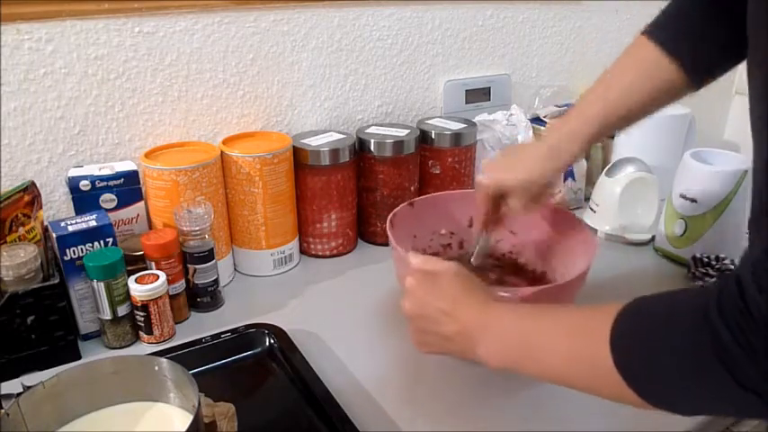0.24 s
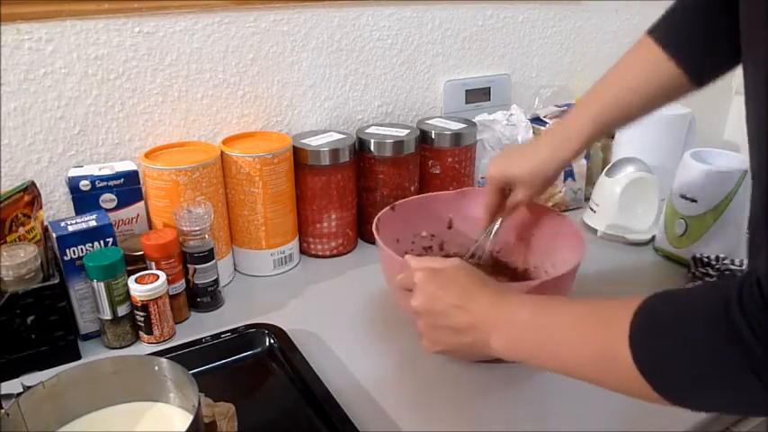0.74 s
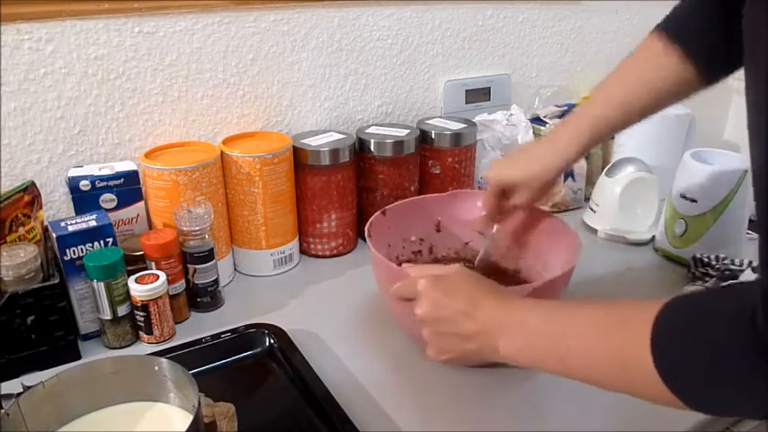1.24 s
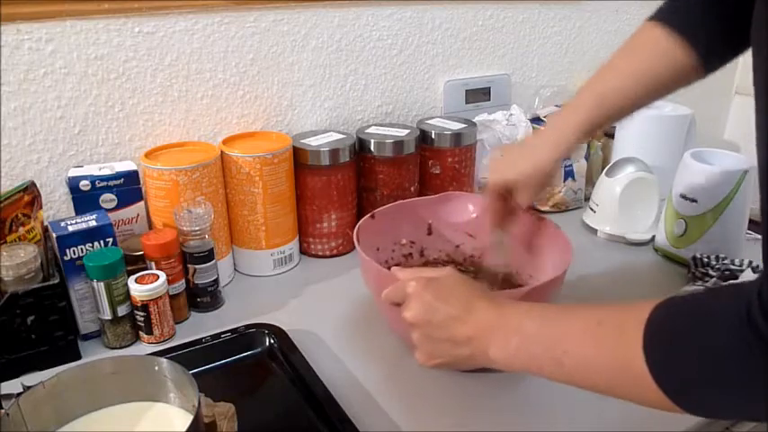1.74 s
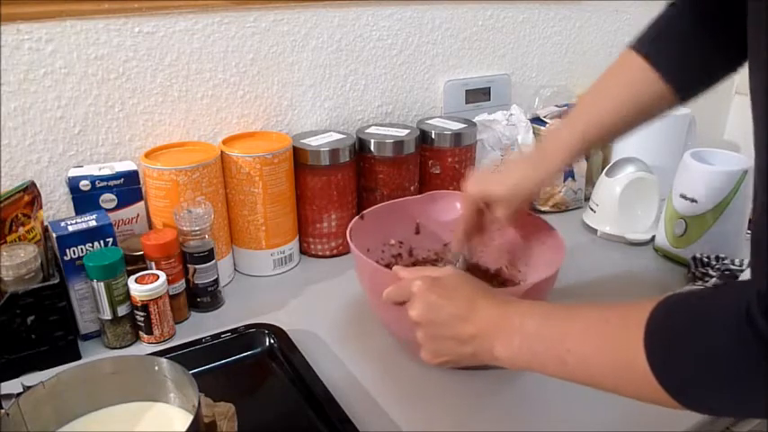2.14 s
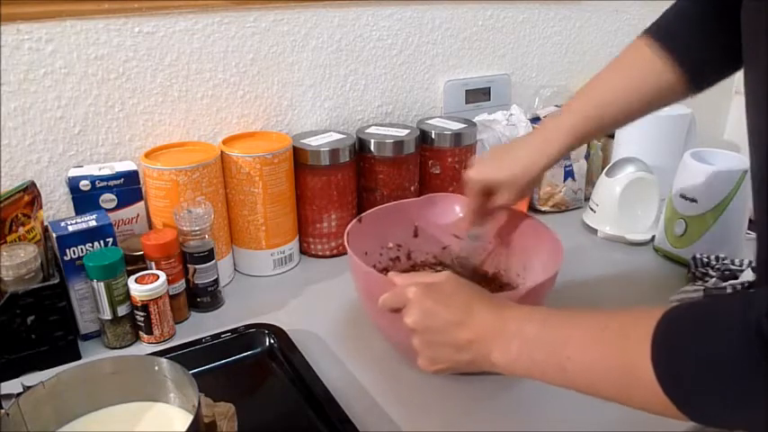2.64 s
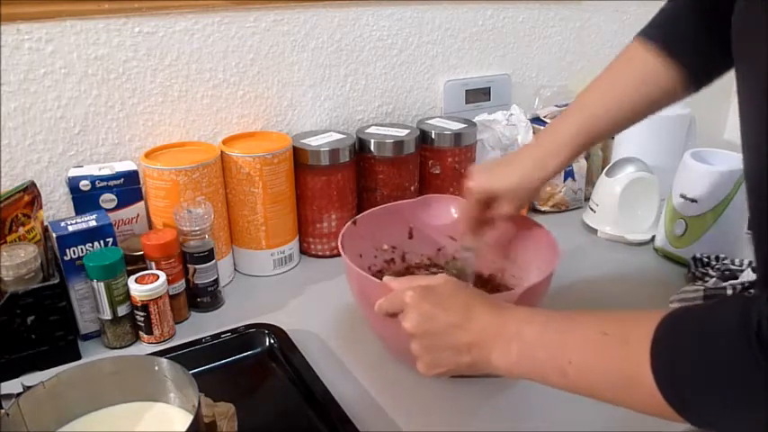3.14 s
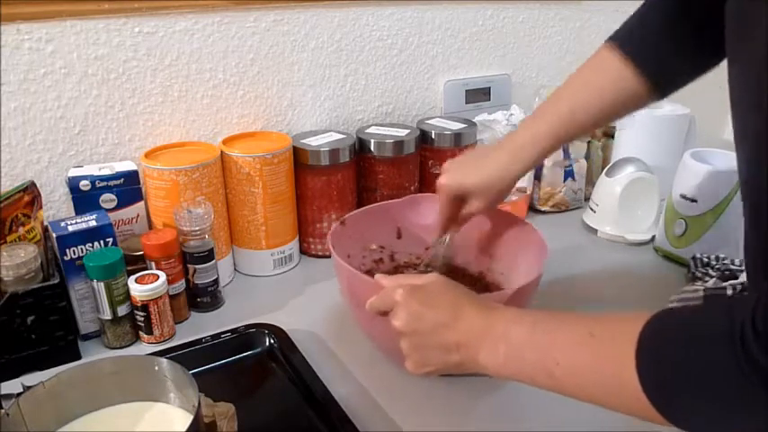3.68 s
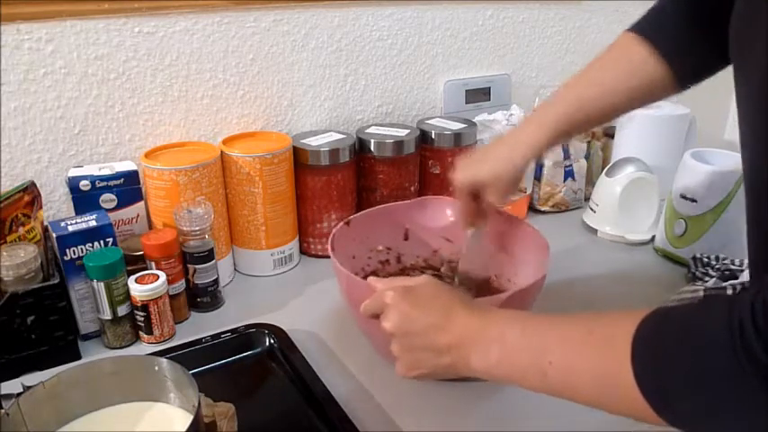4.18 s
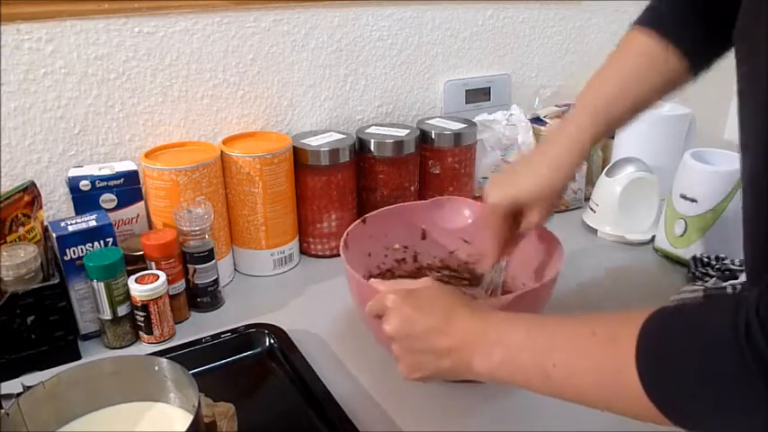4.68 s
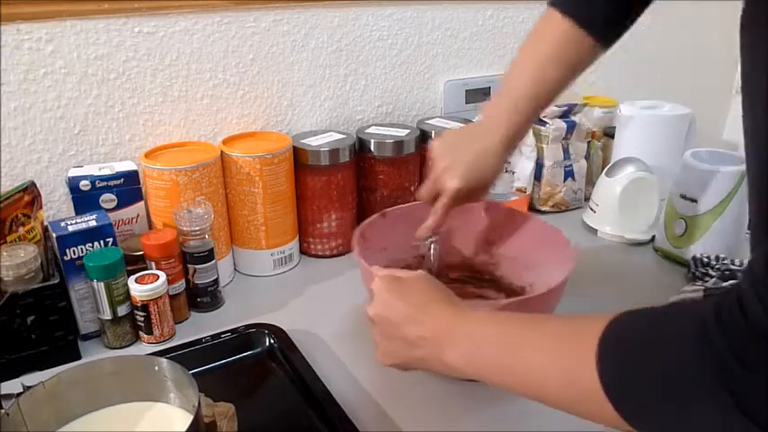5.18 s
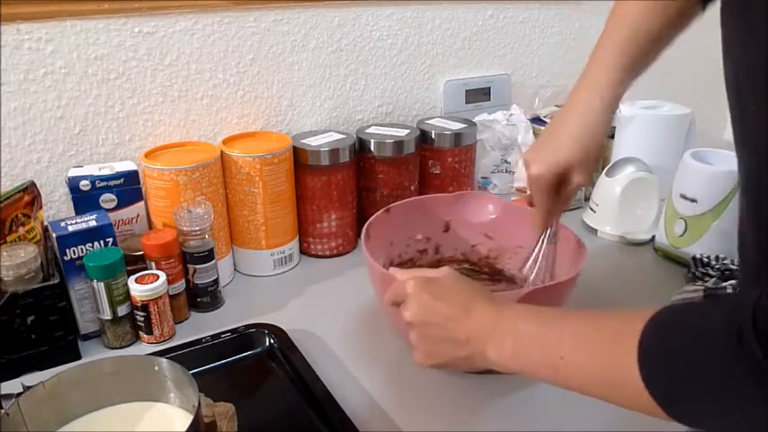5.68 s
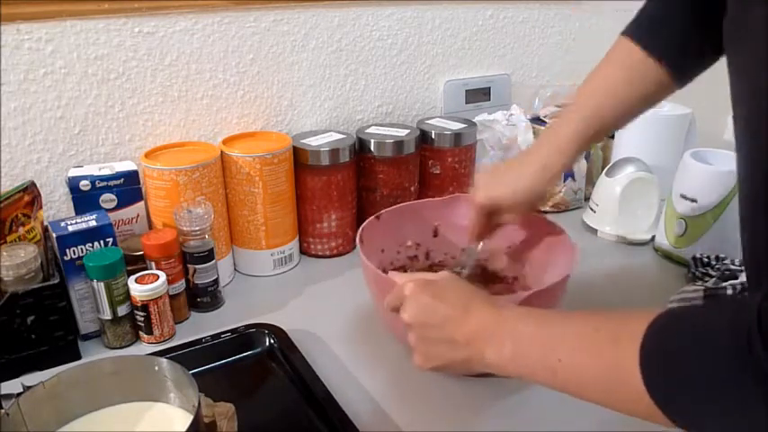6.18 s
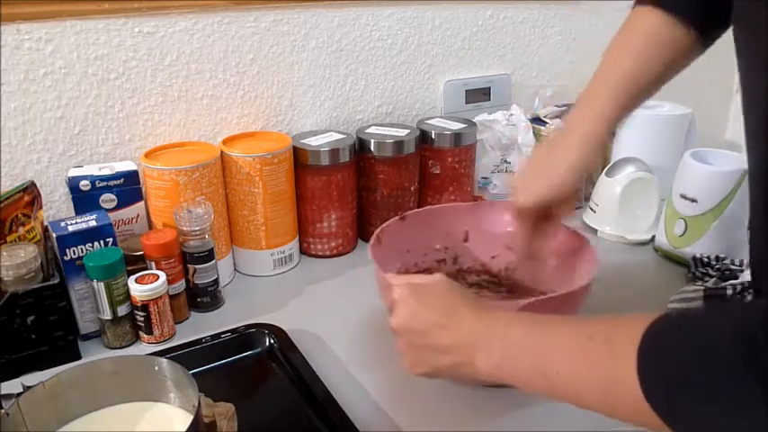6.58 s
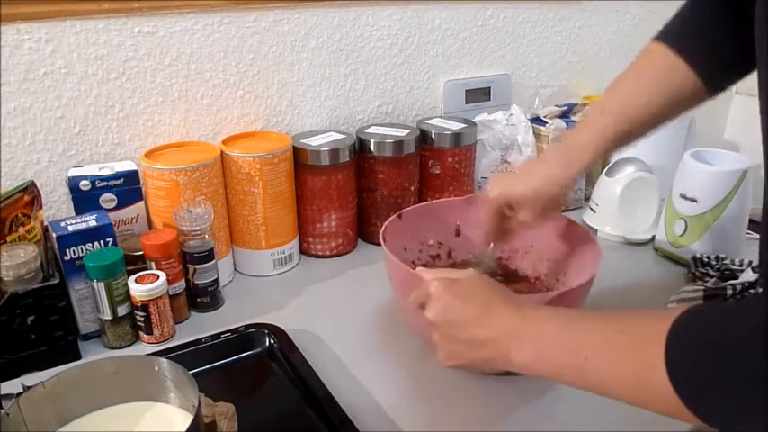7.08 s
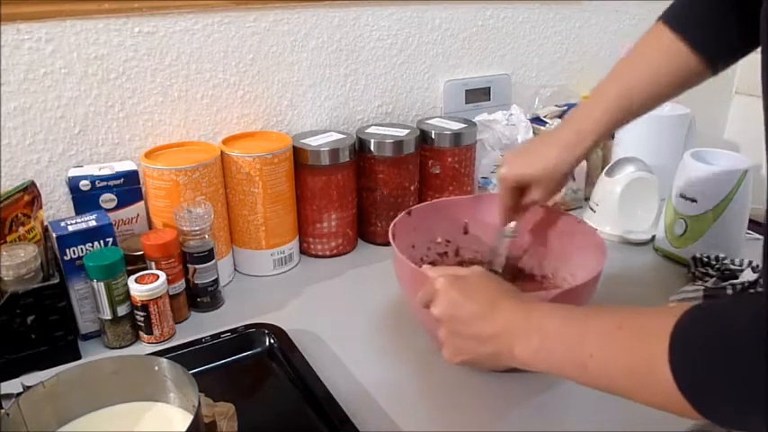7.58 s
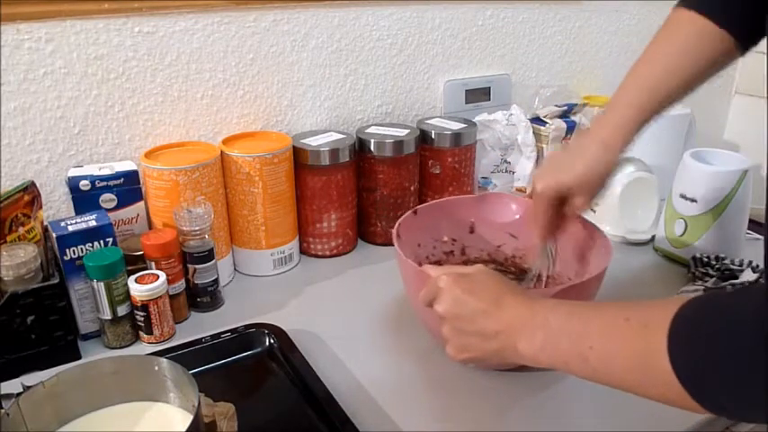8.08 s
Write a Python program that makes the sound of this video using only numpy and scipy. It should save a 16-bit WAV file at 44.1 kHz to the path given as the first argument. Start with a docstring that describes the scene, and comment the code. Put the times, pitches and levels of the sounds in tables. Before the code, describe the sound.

Quick, uneven clicking and scraping of a whisk against a plastic bowl as thick batter squelches in a quiet kitchen.

```python
"""A wire whisk beats thick batter in a plastic bowl on a kitchen counter, about three turns a second.
The wires knock on the damped wall and drag over it in small slips; the batter tears and squelches
as tiny air pockets snap open. Now and then the whisk strikes the bare plastic above the batter,
hard and ringing. Counter, jars and wall throw the sound back at once, and the kitchen rings briefly
over a soft room tone."""
import sys
import numpy as np
from scipy import signal
from scipy.io import wavfile

SR = 44100
rng = np.random.default_rng(int(sys.argv[2]) if len(sys.argv) > 2 else 0)


def materialize(psi):
    """Save the field psi as 16-bit PCM at rate SR to the path in sys.argv[1].

    A 1-D psi becomes a single channel; in a 2-D psi each row is a channel.
    """
    bounded = np.clip(np.atleast_2d(psi).T, -1, 1)
    quanta = np.round(bounded * 32767).astype(np.int16)
    wavfile.write(sys.argv[1], SR, quanta)


N = 366912

# Wires knocking on the bowl, in four layers: thud of the base, hollow wall note, clack, wire tick.
# time_s, thud_db, note_db, clack_db, tick_db, note_hz, clack_hz, tick_hz
KNOCK_CUES = [(0.1002, -42.5, -28.5, -38, -51, 627, 1710.0, 3600.0),
              (0.1353, -33, -23.5, -31, -48, 520, 1550, 3900.0),
              (0.1902, -47, -31, -32.5, -49, 560, 1600, 3570),
              (0.2168, -27, -21, -27, -30, 570.0, 1840, 3590),
              (0.3994, -43, -25.5, -24.5, -26, 536, 1620, 3500.0),
              (0.4599, -25, -21.5, -28.5, -32.5, 520.0, 1710, 3590),
              (0.5754, -34.5, -27, -29.5, -37.5, 620, 1760, 3080),
              (0.6752, -37, -30, -30.5, -57, 524, 1140, 3280),
              (0.7065, -37, -59, -32, -24, 610.0, 2500, 3650),
              (0.8369, -28, -18, -25.5, -34, 570.0, 1290, 3170),
              (0.935, -37, -22.5, -28, -29.5, 554, 1630, 5100.0),
              (0.9795, -35, -19.5, -33, -42, 510.0, 1620, 3820),
              (1.197, -36, -25, -37, -51, 670.0, 1134, 3580),
              (1.2594, -26.5, -20, -25.5, -44, 590, 1462, 3390),
              (1.3599, -42, -26.5, -34, -36, 540.0, 1460.0, 3060),
              (1.5121, -52, -28, -28, -26.5, 683, 1750, 3830),
              (1.5645, -38, -26.5, -36, -33, 640, 1500, 3900.0),
              (1.6399, -40, -32, -30, -28, 580.0, 2230, 3400),
              (1.67, -58, -33, -42, -36, 700.0, 2000.0, 3600.0),
              (1.8019, -27.5, -20, -23, -32, 570.0, 1830, 3220),
              (1.866, -48, -50, -46, -38.5, 557, 1660, 3630), (1.9071, -33, -22, -43, -36, 577, 1220, 3490),
              (2.0278, -35.5, -29, -37, -41.5, 510.0, 1290.0, 3600.0),
              (2.071, -36, -37, -28.5, -63, 544, 1290, 3100.0),
              (2.1425, -51.5, -28, -37, -28, 545, 2150, 4050),
              (2.3002, -44, -30.5, -46, -49, 550.0, 1490, 4100.0),
              (2.3716, -24.5, -18.5, -26.5, -43, 521, 1570, 3960),
              (2.4144, -42, -31, -28.5, -25.5, 513, 1540, 4390),
              (2.4826, -44, -29, -36, -43, 510, 1550, 3800),
              (2.5938, -61, -29.5, -36, -31, 654, 2160, 4530),
              (2.6575, -30.5, -22.5, -40, -41.5, 493, 1470, 3700.0),
              (2.706, -55.5, -30, -45, -35.5, 514, 1730.0, 4240),
              (2.752, -57, -32, -29.5, -31, 520.0, 1990, 3720),
              (2.7613, -50, -24, -32, -45, 514, 2190.0, 3420),
              (2.7802, -57, -49, -33, -33, 640, 1820, 3960),
              (2.8085, -46, -27, -34, -54, 540.0, 1640.0, 3600.0),
              (2.861, -50, -30, -30, -29, 540, 1710, 4200),
              (2.9331, -23.5, -19, -22.5, -38, 600, 1695, 3310),
              (3.0169, -54, -45, -38, -29.5, 630.0, 1825, 4230),
              (3.0394, -31, -21.5, -30, -45, 576, 1700, 3100.0),
              (3.114, -32.5, -23.5, -47.5, -52, 580, 1160, 3300.0),
              (3.1525, -59, -21.5, -30, -41, 556, 1530, 3400.0),
              (3.183, -20.5, -16.5, -19.5, -27, 570, 1400, 3580),
              (3.2828, -30, -20, -49, -39, 610.0, 1270, 3230),
              (3.3454, -67, -40.5, -37, -33.5, 499, 1760, 3970),
              (3.3565, -30.5, -26, -44, -57, 546, 1640.0, 3800.0),
              (3.423, -28.5, -22.5, -32.5, -37, 500.0, 1660, 3700.0),
              (3.4966, -43, -30, -31, -32, 533, 1880, 4100.0),
              (3.603, -29.5, -27.5, -47, -40.5, 500.0, 1345, 3660),
              (3.669, -25, -18, -26, -50, 610, 1360.0, 3730),
              (3.791, -45, -32, -28, -54, 600.0, 1310.0, 3270),
              (3.8113, -39, -22, -25, -28, 596, 1920.0, 4100.0),
              (3.8694, -32, -26.5, -34, -36.5, 536, 1450.0, 3770),
              (3.926, -25.5, -17, -22, -26.5, 510.0, 1330, 4100),
              (4.0482, -57, -32, -35, -36, 580.0, 1950, 3420),
              (4.1118, -46, -30.5, -40, -43, 525, 1980, 3200.0),
              (4.147, -63, -32.5, -47, -40, 544, 1900, 4030),
              (4.2217, -29.5, -23, -34, -45, 500.0, 1290, 3450),
              (4.3501, -41.5, -28, -26, -32.5, 680.0, 1860, 3220),
              (4.46, -48, -32, -35.5, -42, 568, 1440, 3500.0),
              (4.5079, -29, -23, -32, -39, 530.0, 1380, 3300.0),
              (4.5286, -50, -32, -33.5, -37, 540.0, 1310, 3630),
              (4.703, -42.5, -28, -31.5, -38, 748, 1990.0, 3400.0),
              (4.789, -47, -27, -41.5, -61, 450, 1310, 3400.0),
              (4.8454, -40, -37, -33, -32, 630.0, 2130, 3920),
              (4.9125, -59, -22, -26, -25.5, 525, 1470, 3860),
              (5.1192, -24, -32, -32, -36, 450.8, 1510, 3200),
              (5.171, -31.5, -25, -32, -38, 578, 1810, 3600), (5.253, -43, -32, -40, -42, 540, 1600, 3400),
              (5.289, -45, -39, -32, -36, 564, 1890, 3500.0), (5.3544, -53, -42, -26, -36, 590, 1960, 3800),
              (5.5586, -46, -35, -24, -34.5, 495, 1240, 3600.0),
              (5.8565, -42, -31.5, -25, -68, 686, 1800, 3105),
              (6.1325, -33.5, -28, -30, -37, 540.0, 1765, 3200.0),
              (6.153, -36.5, -40, -28.5, -36, 560, 1900, 3400),
              (6.1735, -40, -40, -31, -28, 540.0, 1340, 4000.0),
              (6.1834, -37.5, -18, -27.5, -35, 517, 1390, 3300.0),
              (6.2413, -48, -27.5, -41, -49, 500, 1600, 3600),
              (6.2989, -43, -27.5, -20, -35, 816, 1900, 3300.0),
              (6.3573, -43, -33, -25, -39, 700, 1760.0, 3600.0),
              (6.4025, -38, -23.5, -31, -32, 640, 2000.0, 3000.0),
              (6.5619, -47, -26.5, -53, -56, 560, 1589, 3400),
              (6.597, -46.5, -35.5, -32.5, -47, 600, 1820, 3280),
              (6.799, -45, -38, -42, -40, 593, 1780.0, 3850),
              (6.948, -54, -42, -35, -40, 550.0, 2080.0, 3200.0),
              (6.9739, -45, -21, -24.5, -31, 523, 1630, 3600.0),
              (7.083, -39, -36, -43, -43, 520, 1560, 3820), (7.1838, -40, -25.5, -35, -55, 640, 1960, 3440),
              (7.2505, -29, -26.5, -32.5, -39.5, 516, 1720, 3200.0),
              (7.3139, -24, -17.5, -25, -31.5, 613, 1570, 3130),
              (7.4182, -45, -31.5, -33, -34, 580, 2160.0, 3540),
              (7.5352, -32.5, -23, -34.5, -59, 533, 1720, 3500.0),
              (7.5957, -27, -23, -31.5, -33, 540.0, 1390, 3280),
              (7.8218, -34, -28.5, -31.5, -43, 530.0, 1210, 4140),
              (7.8851, -28, -22.5, -32.5, -42, 540.0, 1380, 3500),
              (8.1341, -59, -26.5, -44, -61, 530.0, 1440, 3500.0),
              (8.1718, -30.5, -22.5, -35, -42, 506, 1540, 3260)]
# Borders of the thud, note, clack and tick bands: edge_hz
KNOCK_EDGES_HZ = [150, 430, 1000, 2600, 7500]
# Modes of the bowl, damped by batter and hand: pitch_hz, level_db, t60_s
BOWL_MODES = [(230, -21.5, 0.065), (322.6, -5.5, 0.063), (388.2, -3.5, 0.22), (471, 4, 0.021),
              (518, 0, 0.033), (661, 4, 0.057), (730, -19, 0.0051), (846, 0.5, 0.018), (1274, 5, 0.037),
              (1426, -0.5, 0.032), (1720, 4, 0.022), (1790, -1.5, 0.022), (1930, 2, 0.025),
              (2560, -12, 0.032), (3044, 1.5, 0.041), (3680, -18, 0.0019), (3830, -8, 0.015),
              (4800, -16.5, 0.0038)]
# Hard strikes on the bare wall: time_s, tick_db, chatter_db, the spot's resonances (pitch_hz, level_db)
STRIKE_CUES = [(5.1079, -26, -23, [(560, -21), (790, -23.5), (1464, -19.5), (1600, -18.5), (1880, -23),
               (2412, -21.5), (2950, -26)]), (5.1183, -43, -23, [(1520, -27.5), (2040, -30), (2950, -32)]),
               (5.508, -24.5, -19, [(345, -29.5), (470, -19), (689, -20), (1464, -28), (1583, -17.5),
               (1730, -18), (1990, -19.5), (2455, -24.5), (3047, -26)]), (6.718, -27, -30, [(328, -23),
               (571, -21.5), (660, -13), (1034, -23), (1200, -20.5), (1626, -19.5), (1884, -22),
               (2202, -24.5), (2820, -23.5)]), (7.716, -31, -23, [(694, -15.5), (860, -18), (1195, -16.5),
               (1440, -20.5), (2304, -33.5), (2767, -25.5), (3165, -27)])]
# Sweeps of the whisk round the bowl: start_s, length_s, rub_db, scrape_db, tear_db
SWEEP_CUES = [(-.07, 0.053, -18, -20, -25), (0.151, 0.92, -34, -37, -43), (0.425, 0.22, -33, -37, -54.5),
              (0.728, 0.14, -34, -35.5, -45.5), (0.947, 0.22, -33.5, -38.5, -38),
              (1.195, 0.3, -34.5, -41, -43.5), (1.501, 0.2, -38, -43, -39.5),
              (1.727, 0.66, -35.5, -42, -46), (2.05, 0.2, -35.5, -37.5, -49), (2.279, 0.24, -32, -42, -39),
              (2.573, 0.21, -37, -38.5, -37), (2.807, 0.23, -31, -40, -42),
              (3.109, 0.13, -32.5, -36, -41.5), (3.356, 0.33, -32.5, -38.5, -44.5),
              (3.654, 0.16, -34, -42, -38), (3.865, 0.18, -35, -54, -43), (4.084, 0.28, -37.5, -44, -42),
              (4.393, 0.18, -40.5, -44.5, -50), (4.533, 0.14, -34.5, -38.5, -41),
              (4.682, 0.17, -35.5, -35, -44), (5.15, 0.29, -41, -34.5, -39.5), (5.651, 0.1, -51, -32, -44),
              (5.93, 0.14, -37.5, -32.5, -43.5), (6.112, 0.18, -39, -39, -39.5),
              (6.304, 0.35, -33.5, -38, -40.5), (6.763, 0.11, -36, -39.5, -59),
              (6.945, 0.24, -37, -39.5, -45.5), (7.245, 0.26, -35.5, -46, -41.5),
              (7.496, 0.55, -39, -48, -47), (7.904, 0.14, -35, -40.5, -53), (8.047, 0.23, -39.5, -39, -50)]
# Wet swipes of the wires through the batter: peak_s, level_db, half_length_s
SWIPE_CUES = [(0.129, -30, 0.015), (0.321, -33.5, 0.026), (0.766, -34, 0.0047), (1.572, -27.5, 0.026),
              (1.639, -26, 0.0085), (2.134, -33, 0.028), (2.553, -32, 0.0072), (2.867, -30, 0.028),
              (3.456, -38, 0.011), (4.611, -33.5, 0.031), (4.853, -24, 0.024), (5.97, -36, 0.014),
              (6.064, -34, 0.012), (7.076, -42, 0.026), (7.36, -34, 0.024), (7.945, -31, 0.029)]
# The whisk lifted clear of the batter: up_s, down_s
LIFT_CUES = [(4.96, 5.09), (5.42, 5.51), (5.745, 5.93), (6.63, 6.71), (7.47, 7.6)]
# Hollow rub of the bowl's wall: frequency_hz, gain_db
RUB_EQ = [(40, -57.5), (80, -21.5), (140, -12.5), (250, -5.5), (400, -8), (490, 3.5), (580, 5.5),
          (690, 1.5), (800, -4.5), (1100, -4), (1800, -37), (5000, -57.5)]
# Gritty scrape of the wires: frequency_hz, gain_db
SCRAPE_EQ = [(300, -51.5), (700, -10), (1100, 0), (1500, -1), (2000, -2.5), (2700, -4), (3600, -7.5),
             (7000, -21.5)]
# Squelch of tearing batter: frequency_hz, gain_db
SQUELCH_EQ = [(500, -15), (1800, 3), (3000, -4), (4000, -1.5), (5200, -7), (6300, -1.5), (7500, -3.5)]
# Bright swish of a wet swipe: frequency_hz, gain_db
SWIPE_EQ = [(500, -16), (1800, -1.5), (3000, 2), (4500, -1), (6300, -0.5), (7500, 1.5)]
# Early reflections off counter, jars and walls: delay_s, signed_gain
REFLECTIONS = [(.0016, 0.034), (.0068, -0.19), (.0098, 0.16), (.014, -0.11), (0.0164, -0.21),
               (0.0195, 0.34), (0.021, -0.63), (.029, 0.34)]
# Tone of those reflections, their treble scattered by clutter: frequency_hz, gain_db
REFLECTION_EQ = [(100, -3.5), (700, -3), (1500, -5.5), (3000, -14.5), (7500, -12.5)]
# Standing waves between counter, wall and cupboard: pitch_hz, level_db, t60_s
NOOK_MODES = [(147.6, 14.5, 0.16), (198, -10.5, 0.052), (321.6, 1, 0.2), (438, -7.5, 0.04),
              (572, -17, 0.47), (567, -16.5, 0.36), (625, -16, 0.54), (697, -4.5, 0.2)]
# Reverb time of the kitchen: frequency_hz, t60_s
TAIL_DECAY = [(60, 0.49), (200, 0.3), (550, 0.41), (1500, 0.36), (3700, 0.27), (7500, 0.25)]
# Tone of the tail; the bowl's hollow note stays mostly near the counter: frequency_hz, gain_db
TAIL_EQ = [(150, 0.5), (400, 2.5), (550, -3.5), (800, -2.5), (1500, 1), (3500, 3), (7500, -0.5)]
# Tone of the still room: frequency_hz, gain_db
ROOM_TONE_EQ = [(25, -44.5), (60, -23.5), (150, -3.5), (500, -6.5), (2000, -10.5), (7000, -26)]
# Response of the small microphone: frequency_hz, gain_db
MIC_EQ = [(30, -35), (90, -15), (160, -12.5), (500, -1.5), (1000, -5.5), (2000, -0.5), (3500, -2),
          (5200, 2.5), (6200, -5), (7000, -11.5), (7700, -32.5)]
# Between sweeps the whisk still trails in the batter: rub_db, scrape_db, tear_db
TRAILING_LEVELS_DB = (-46.5, -50.5, -61)

RUB, SCRAPE, TEAR = range(3)  # the three stirring layers
BAND_LIMIT_HZ = 7850
ATTACK_SAMPLES = 350  # a hit's level is set over this opening stretch


def knocks(rattle_db=-23, rattle_per_s=450, rattle_s=0.005, push_s=0.0081, lead_s=0.00032):
    """A wire snaps on the bowl and rings it briefly; the other wires land just after it."""
    t, out = np.arange(2600) / SR, np.zeros(N)
    bands = [signal.butter(3, edges, "band", fs=SR, output="sos")
             for edges in zip(KNOCK_EDGES_HZ, KNOCK_EDGES_HZ[1:])]
    push = t / push_s * (2 - t / push_s) * np.exp(-t / push_s)  # the blow presses the bowl on the counter
    for time_s, thud_db, note_db, clack_db, tick_db, note_hz, clack_hz, tick_hz in KNOCK_CUES:
        ring = bowl_ring(t)
        glancing = np.clip(0.5 + (tick_db - note_db + 5.5) / 23, 0, 1)  # bright knocks are glancing
        wires = amp(rattle_db) * rng.standard_normal(len(t)) * np.exp(-t / rattle_s)
        wires *= sparse(rattle_per_s, len(t))
        wires[0] = 1
        blow = signal.fftconvolve(ring + crack(glancing, t), wires)[:len(t)]
        # the spot that is hit favours three pitches
        for hz, q, boost_db in ((note_hz, 4, 6), (clack_hz, 3.9, 3), (tick_hz, 2.4, 3)):
            blow = blow + amp(boost_db) * signal.lfilter(*signal.iirpeak(hz, q, fs=SR), blow)
        push_db = min(thud_db, -25.5) - 11  # the hand holding the bowl limits the push
        add(out, time_s - lead_s, amp(push_db) * push + amp(tick_db) * wire_ping(tick_hz, t))
        for band, width_hz, db in zip(bands, np.diff(KNOCK_EDGES_HZ), (thud_db, note_db, clack_db, tick_db)):
            # narrow bands swell slowly and start sooner, so all four land as one hit
            layer = unit_attack(signal.sosfilt(band, blow))
            add(out, time_s - lead_s - 0.5 / width_hz, amp(db) * layer)
    return out


def bowl_ring(t, scatter_db=2, detune=0.033):
    """The body of a knock: moving batter shifts each mode's level and pitch from blow to blow."""
    hz, db, t60_s = np.transpose(BOWL_MODES)
    damping, load = rng.standard_normal((2, len(BOWL_MODES)))
    modes = amp(-60 * t / t60_s[:, None]) * np.cos(2 * np.pi * np.outer(hz * (1 + detune * load), t))
    return amp(db - 3 + scatter_db * damping) @ modes


def crack(glancing, t, decay_s=0.0015, zip_s=0.0038, low_cut_hz=300):
    """Steel meets plastic: one snap when square on, a short zip of the wire when glancing."""
    zipping = np.sin(np.pi * np.minimum(t / zip_s, 1)) ** 0.5
    touch = rng.standard_normal(len(t)) * ((1 - glancing) * np.exp(-t / decay_s) + glancing * zipping)
    touch[0] = amp(15) * (1 - glancing)  # the snap
    return amp(21) * signal.lfilter([1, -1], [1, -np.exp(-2 * np.pi * low_cut_hz / SR)], touch)


def wire_ping(tick_hz, t, level_db=-14, t60_s=0.03, spread_octaves=0.3):
    """Four steel wires of slightly different length ring faintly round the pitch of the tick."""
    hz = np.minimum(tick_hz * 2 ** (spread_octaves * rng.standard_normal(4)), BAND_LIMIT_HZ)
    return amp(level_db - 60 * t / t60_s) * unit_rms(np.sin(2 * np.pi * np.outer(hz, t)).sum(0))


def wall_note(ring_db=-12, t60_s=0.24):
    """A knock high on the wall, with little thud, lets the hollow note ring on."""
    t, out = np.arange(11000) / SR, np.zeros(N)
    for time_s, thud_db, note_db, _, _, note_hz, *_ in KNOCK_CUES:
        freedom = np.clip((note_db - thud_db - 15) / 10, 0, 1)
        envelope = freedom * amp(note_db + ring_db - 60 * t / t60_s)
        add(out, time_s, envelope * np.sin(2 * np.pi * note_hz * t))
    return out


def strikes(tick_s=0.0027, sing_db=-13.5, sing_t60_s=0.096, chatter_per_s=900, chatter_s=0.0064):
    """Steel on bare plastic: a tick, a few clear resonances that sing on, and chattering wires."""
    t, out = np.arange(9000) / SR, np.zeros(N)
    treble = signal.butter(2, [3200, KNOCK_EDGES_HZ[-1]], "band", fs=SR, output="sos")
    for time_s, tick_db, chatter_db, resonances in STRIKE_CUES:
        tick = signal.sosfilt(treble, rng.standard_normal(len(t)) * np.exp(-t / tick_s))
        hit = amp(tick_db) * unit_attack(tick)
        for hz, db in resonances:
            tone = np.sin(2 * np.pi * hz * t)
            swell_s = 0.0019 * (600 / hz) ** 0.47  # high resonances swell and die sooner
            ring = unit_attack(t * np.exp(-t / swell_s) * tone)
            sing = amp(sing_db - 60 * t / sing_t60_s) * tone
            hit += amp(db) * (ring + sing)
        wires = amp(chatter_db) * rng.choice([-1, 1], len(t)) * np.exp(-t / chatter_s)
        wires *= sparse(chatter_per_s, len(t))
        wires[0] = 1
        add(out, time_s, signal.fftconvolve(hit, wires))
    low_cut = signal.butter(5, 275, "high", fs=SR, output="sos")  # the strikes carry little bass
    return signal.sosfilt(low_cut, out)


def dragging(slips_per_s=130, grate_s=0.01, grains_per_s=9000):
    """The wires slip along the wall: every slip pushes the bowl and grates for a moment."""
    slips = clicks(slips_per_s, spread_db=3, cap=2.85)
    grating = signal.lfilter([1], [1, -np.exp(-1 / (grate_s * SR))], abs(slips))
    grit = unit_rms(grating * clicks(grains_per_s, spread_db=2.8, cap=3.2))
    rub = unit_rms(eq(unit_rms(slips) + amp(-5) * grit, RUB_EQ))
    scrape = unit_rms(eq(amp(-16.5) * unit_rms(slips) + grit, SCRAPE_EQ))
    return amp(-2) * rub * sweep_gain(RUB) + amp(-1) * scrape * sweep_gain(SCRAPE)


def batter():
    """Tearing batter squelches with pops over a fine wet fizz; swipes are brighter and fizzier."""
    pops = air_pockets()
    squelch = unit_rms(eq(pops + amp(-6) * rng.standard_normal(N), SQUELCH_EQ))
    swish = unit_rms(eq(pops + rng.standard_normal(N), SWIPE_EQ))
    swipe_gain = np.zeros(N)
    for peak_s, db, half_s in SWIPE_CUES:
        add(swipe_gain, peak_s - half_s, amp(db) * np.hanning(round(2 * half_s * SR)))
    return amp(-1) * (squelch * sweep_gain(TEAR) + swish * swipe_gain)


def air_pockets(pops_per_s=300, decay_cycles=3, glide=0.28, size=400):
    """Tiny air pockets snap open, each a blip of a few cycles that rises in pitch."""
    t = np.arange(size) / SR
    snaps = clicks(pops_per_s, spread_db=5.5, cap=2.8)
    pocket_hz = rng.uniform(1420, 7500, N)
    out = np.zeros(N)
    for at in np.flatnonzero(snaps):
        cycles = pocket_hz[at] * t
        rise = 1 + glide * np.tanh(cycles / decay_cycles / 2)
        pop = np.exp(-cycles / decay_cycles) * np.sin(2 * np.pi * cycles * rise)
        add(out, at / SR, snaps[at] * np.sqrt(pocket_hz[at]) * pop)
    return unit_rms(out)


def sweep_gain(layer, bite_s=0.017, sag_db_per_s=14, release_s=0.051):
    """Envelope of a stirring layer: each sweep bites, loses force as the wires come round, and lets go."""
    t, gain = np.arange(N) / SR, np.full(N, amp(TRAILING_LEVELS_DB[layer]))
    for start_s, length_s, *levels_db in SWEEP_CUES:
        corners_s = start_s + np.array([0, min(bite_s, length_s), length_s, length_s + release_s])
        swell = np.interp(t, corners_s, [0, 1, amp(-sag_db_per_s * length_s), 0])
        gain = np.maximum(gain, amp(levels_db[layer]) * swell)
    return gain


def contact_gain(flight_s=0.011, flight_db=-8, hard_db=-22, lift_db=-12, ease_s=0.02):
    """The stirring ducks while the whisk is lifted, and for a moment as it flies towards a hard hit."""
    t, flying = np.arange(N) / SR, np.zeros(N)
    hard_knocks = [s for s, _, note_db, clack_db, *_ in KNOCK_CUES if max(note_db, clack_db) > hard_db]
    for time_s in hard_knocks + [cue[0] for cue in STRIKE_CUES]:
        add(flying, time_s - flight_s, np.hanning(round(0.87 * flight_s * SR)))
    lifted = sum(np.clip(np.minimum(t - up, down - t) / ease_s + 0.5, 0, 1) for up, down in LIFT_CUES)
    return amp(flight_db * flying + lift_db * lifted)


def lump_gain(depth_db=2, lumps_per_s=45):
    """The batter is lumpy: the wires catch and come free many times in each sweep."""
    place = np.arange(N) * lumps_per_s / SR
    drag = np.clip(rng.standard_normal(N), -2, 2)
    return unit_rms(amp(depth_db * np.interp(place, np.arange(N), drag)))


def kitchen(sound, send, sway_hz=6):
    """Direct sound, early reflections and standing waves, plus a diffuse tail fed by the send."""
    t = np.arange(SR // 2) / SR
    near = np.zeros(len(t))
    for delay_s, gain in REFLECTIONS:
        add(near, delay_s, [gain])
    near = eq(near, REFLECTION_EQ)
    add(near, 0.00042, [0.9])  # the direct sound
    for hz, db, t60_s in NOOK_MODES:
        peak_scale = 2 * np.log(1000) / (t60_s * SR)  # makes the gain at resonance independent of decay
        near += amp(db - 3 - 60 * t / t60_s) * np.cos(2 * np.pi * hz * t) * peak_scale
    # four tails take turns, so no fixed pitch rings on in them
    sway = 2 * np.pi * sway_hz * np.arange(N) / SR
    shares = [wave(k * sway) / np.sqrt(2) for k in (1, 2) for wave in (np.sin, np.cos)]
    return signal.oaconvolve(sound, near)[:N] + sum(diffuse_tail(send * share) for share in shares)


def diffuse_tail(send, build_s=0.0016, reflections_per_s=4000, size=32768):
    """A wash of sparse reflections, each band dying at its own speed."""
    t = np.arange(size) / SR
    taps = rng.choice([-1., 1.], size) * sparse(reflections_per_s, size)
    taps *= 1 - np.exp(-(t / build_s) ** 2)
    hz, age_s, spectrum = signal.stft(taps, SR, nperseg=512)
    gain_db = curve(TAIL_EQ, hz)[:, None] - 60 * age_s / curve(TAIL_DECAY, hz)[:, None]
    tail = signal.istft(spectrum * amp(gain_db), SR)[1]
    return signal.oaconvolve(send, tail / np.linalg.norm(tail))[:N]


def room_tone(level_db=-43):
    """The still kitchen: a soft, steady bed of dark noise."""
    return amp(level_db) * unit_rms(eq(rng.standard_normal(N), ROOM_TONE_EQ))


def clicks(per_s, spread_db, cap):
    """Random clicks of either sign: many small, a few up to cap * spread_db louder."""
    chance, size, sign = rng.random((3, N))
    level_db = spread_db * np.minimum(-np.log(1 - size), cap)
    return (chance < per_s / SR) * np.sign(sign - 0.5) * amp(level_db)


def sparse(per_s, size):
    """A gate that opens on random single samples."""
    return rng.random(size) < per_s / SR


def eq(x, points, size=4096):
    """Minimum-phase EQ, so clicks keep their sharp fronts."""
    log_gain = np.log(amp(curve(points, abs(np.fft.fftfreq(size, 1 / SR)))))
    taps = np.fft.ifft(np.exp(np.conj(signal.hilbert(log_gain)))).real
    return signal.oaconvolve(x, taps[:size // 2])[:len(x)]


def curve(points, hz):
    """Reads (frequency_hz, value) points on a log-frequency axis."""
    points_hz, values = np.transpose(points)
    return np.interp(np.log(hz + 1), np.log(points_hz + 1), values)


def add(mix, time_s, sound):
    """Drops a sound into the mix at a time."""
    part = mix[max(round(time_s * SR), 0):][:len(sound)]
    part += sound[:len(part)]


def amp(db):
    """Decibels to gain."""
    return 10 ** (np.asarray(db) / 20)


def unit_rms(x):
    """Scales to rms 1."""
    return x / np.sqrt(np.mean(x ** 2) + 1e-20)


def unit_attack(x):
    """Scales a hit so that its attack has unit level."""
    return x / np.std(x[:ATTACK_SAMPLES])


def scene(hit_send_db=-4, stir_send_db=-1):
    """Hits and stirring in the quiet kitchen; the stirring sends more into the tail."""
    bed = room_tone()
    hits = knocks() + wall_note() + strikes()
    stirring = contact_gain() * lump_gain() * (dragging() + batter())
    send = amp(hit_send_db) * hits + amp(stir_send_db) * stirring
    return (kitchen(hits + stirring, send) + bed)[None]


def record(dry):
    """A small mono microphone with thin bass and a steep top cut."""
    low_pass = signal.firwin(301, BAND_LIMIT_HZ, window=("kaiser", 8), fs=SR)
    return signal.oaconvolve(eq(dry[0], MIC_EQ), low_pass, "same")[None]


dry = scene()
out = record(dry)
materialize(out)
```